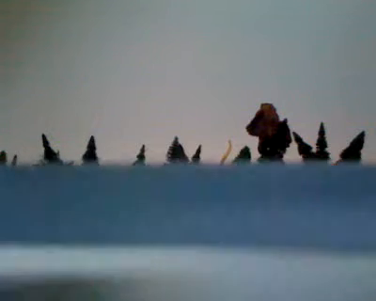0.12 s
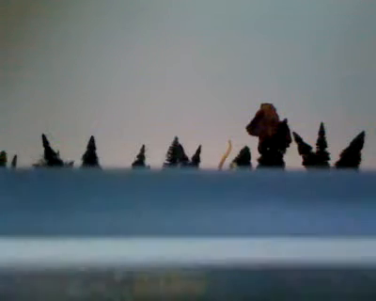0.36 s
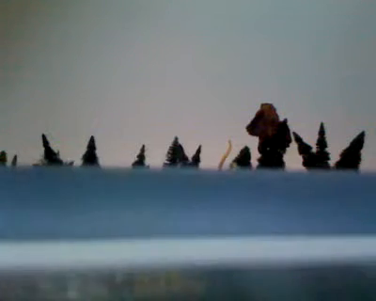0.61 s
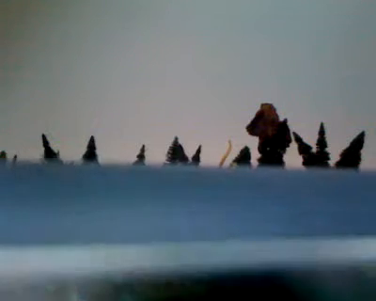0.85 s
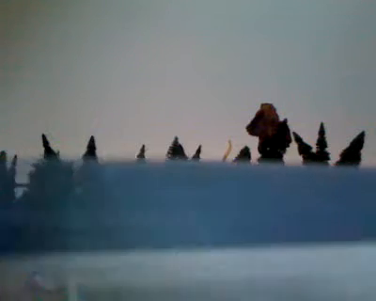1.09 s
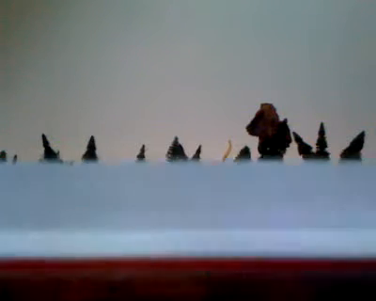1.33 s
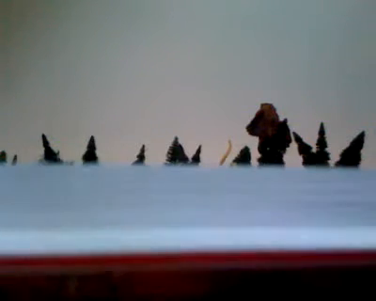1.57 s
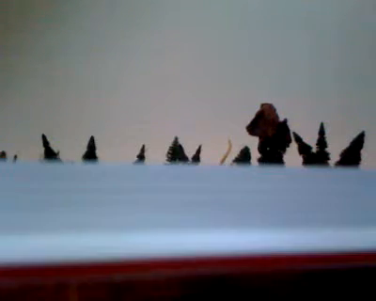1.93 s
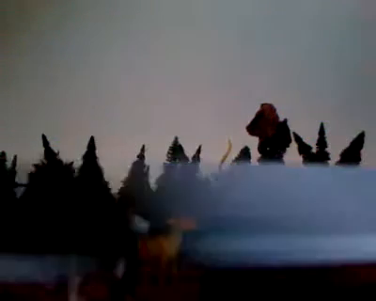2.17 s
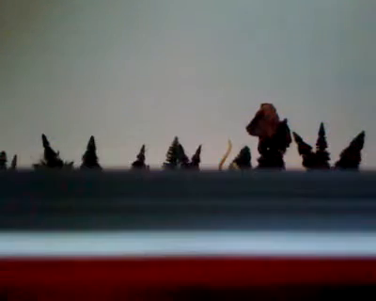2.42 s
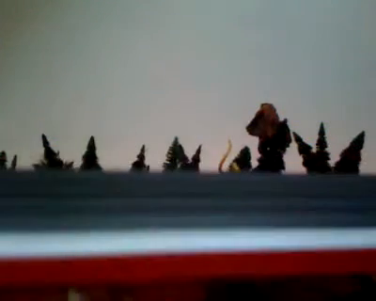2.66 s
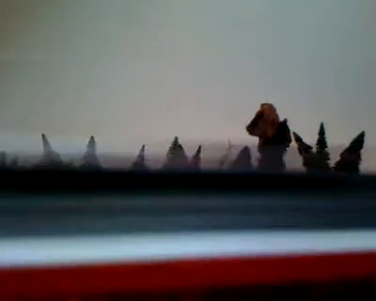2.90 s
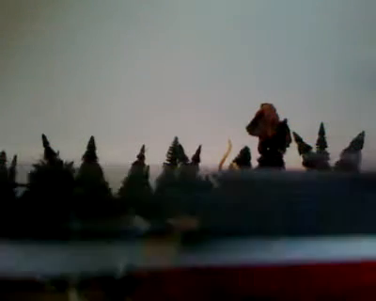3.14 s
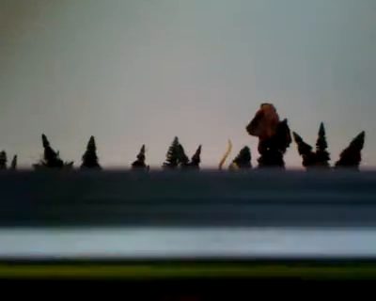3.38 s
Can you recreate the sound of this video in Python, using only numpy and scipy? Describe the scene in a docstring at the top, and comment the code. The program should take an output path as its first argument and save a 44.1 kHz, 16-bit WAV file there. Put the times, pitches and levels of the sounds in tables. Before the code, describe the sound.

A model train rolls past close by for about three and a half seconds, its wheels hissing and crackling steadily. About once a second a coach brings a whirr that sinks in pitch, with slight metallic ringing. Wheels clack in pairs over a rail joint near 1.4, 2.4 and 3.5 seconds. Couplings rattle lightly throughout, while the wooden board rumbles and thumps softly and the motor hums faintly.

```python
"""Beside a model railway fixed to a wooden board, one microphone close to the track.
A train rolls past at about one coach a second, its wheels hissing on the rails and crackling over grit.
Each coach brings a whirr that sinks as it goes by; some wheels rub and ring, and flanges tick.
Pairs of wheelsets clack over a rail joint, and loose couplings and axles rattle.
Underneath, the board rumbles and thumps and the motor hums faintly."""
import sys
import numpy as np
from scipy import signal
from scipy.fft import rfft, irfft
from scipy.io import wavfile
from scipy.ndimage import uniform_filter1d

SR = 44100
rng = np.random.default_rng(int(sys.argv[2]) if len(sys.argv) > 2 else 0)


def wav_out(sig):
    """Save sig, one row per channel (or a flat mono array), as 16-bit PCM at SR to the path in sys.argv[1]."""
    wavfile.write(sys.argv[1], SR, np.round(np.clip(np.atleast_2d(sig).T, -1, 1) * 32767).astype(np.int16))


N = 158760


def rolling():
    """Wheels roll on the rails: a broad hiss, slightly patchy in time and pitch."""
    # Each row: frequency in Hz, relative level in dB.
    spectrum = [(100, -23), (200, -18.5), (300, -8), (480, -10), (620, -5), (820, -1.2), (1100, -1.5),
                (1500, -2), (2400, 0), (3300, -5), (4000, -8), (5000, -13), (7200, -18), (10000, -26),
                (13000, -31), (16000, -38)]
    # Each row: time in seconds, level change in dB.
    swell = [(0, 0), (.25, -.5), (1, 1), (1.25, 0), (1.8, -.5), (2.4, 1), (2.65, 0), (2.85, 0), (3.3, 0.5),
             (3.6, .5)]
    cells = signal.stft(rng.standard_normal(N), nperseg=512)[2]
    patches = uniform_filter1d(rng.standard_normal(cells.shape), size=6, axis=0)
    patch_db = 0.86 * unit(uniform_filter1d(patches, size=9, axis=1))
    hiss = signal.istft(cells * amp(patch_db), nperseg=512)[1][:N]
    flicker_db = 0.5 * drift(rate_hz=51)
    return amp(-40 + level_curve(swell) + flicker_db) * colour(hiss, spectrum)


def coach_whirrs():
    """Each coach brings a rasping band of wheel noise that swells, then sinks in pitch as it leaves."""
    # Each row: start and length in seconds, level in dB, first and last pitch in Hz.
    coaches = [(0.27, 0.93, -47.5, 3150, 2080), (1.332, 1, -46, 3180, 1500), (2.521, 0.79, -46, 3280, 2050),
               (3.37, 1.0, -45, 3300, 1500)]
    out = np.zeros(N)
    for start, length, db, first_hz, last_hz in coaches:
        noise = rng.standard_normal(round(length * SR))
        progress = np.linspace(0, 1, len(noise))
        hz = first_hz + (last_hz - first_hz) * progress ** 2.7
        swell = abs(np.sin(np.pi * progress)) ** 0.18
        add(out, start, amp(db) * swell * resonate(noise, hz, width_hz=1300))
    return out


def joint_clacks():
    """Wheelsets drop into the rail joint: the steel cracks and rings, and the track bed knocks."""
    # Each row: start in seconds, gain in dB, knock gain on top of that in dB, knock pitch in Hz,
    # place in the bogie.
    crossings = [(1.4208, -24, -2, 1710, "leading"), (1.5109, -24.5, -0.5, 1316, "trailing"),
                 (2.4452, -24.5, 0, 1470, "leading"), (2.5330, -27.5, 5.5, 1190, "trailing"),
                 (3.4553, -25.5, 1, 1210, "leading"), (3.5479, -26.5, -10, 1310, "trailing")]
    # Steel striking the rail end. Each row: frequency in Hz, relative level in dB.
    crack_spectrum = [(300, -30), (1000, -14), (3000, -3), (6000, 4), (9000, -5), (15000, -15)]
    # Leading and trailing wheelset. Each row: pitch in Hz, relative level in dB, seconds to fall 60 dB.
    wheel_modes = {"leading": [(2250, -5, 0.011), (3120, 0.5, 0.008), (5300, 0.5, 0.011), (5830, -3, 0.011),
                   (8100, -8, 0.011), (8900, -6, 0.014)], "trailing": [(2730, 0, 0.014), (4300, -3, 0.011),
                   (5470, -5, 0.0094), (7310, 3.5, 0.0079), (8500, -5, 0.011)]}
    metal_rise_s, knock_rise_s, crack_decay_s = 0.00054, 0.00099, 0.0032
    out, t = np.zeros(N), np.arange(2048) / SR
    for start, db, knock_db, hz, wheelset in crossings:
        crack = colour(rng.standard_normal(len(t)), crack_spectrum) * np.exp(-t / crack_decay_s)
        metal = rise(t, metal_rise_s) * (ring(wheel_modes[wheelset], t) + amp(-3.5) * crack)
        bed_modes = [(0.85 * hz, 0, 0.014), (hz, -2, 0.028), (1.32 * hz, -3, 0.021)]
        knock = amp(knock_db) * rise(t, knock_rise_s) * ring(bed_modes, t)
        add(out, start, amp(db) * (metal + knock))
    return out


def rattles():
    """Loose couplings and axles chatter for a few milliseconds, dull or bright."""
    # Each row: start in seconds, relative level of the low, middle and high band in dB.
    chatters = [(0.179, -31, -32, -35), (0.189, -34.5, -38, -32.5), (0.2045, -34, -27.5, -43),
                (.279, -42, -41, -40), (.302, -30.5, -29, -34), (0.37, -42, -34, -36.5),
                (0.482, -29, -28.5, -32.5), (.5432, -41, -36, -37), (0.6514, -45, -26.5, -42),
                (.719, -30, -32, -34.5), (0.8125, -31, -26, -27.5), (0.9197, -39, -28, -34),
                (0.9984, -31, -29, -34.5), (1.063, -28, -27, -37), (1.1528, -35, -31, -37),
                (1.2231, -30, -28.5, -34), (1.3274, -27, -40, -37), (1.352, -37, -26.5, -39),
                (1.4596, -43, -26.5, -35.5), (1.696, -39, -26, -33), (1.756, -40, -34, -34),
                (1.793, -49, -23, -34), (1.850, -50, -25.5, -32), (2.0366, -33, -30, -34.5),
                (2.195, -34, -33, -43), (2.267, -44, -51, -39), (2.372, -29.5, -31, -42),
                (2.392, -42, -25, -32.5), (2.466, -30, -24, -34), (2.487, -38, -28, -33),
                (2.825, -34, -29.5, -37.5), (2.8568, -33, -33, -35.5), (3.0775, -29, -28, -31),
                (3.1748, -29.5, -31, -41), (3.419, -29, -32, -34), (3.459, -36, -22.5, -43),
                (3.51, -30, -25.5, -34.5), (3.5377, -38, -28, -37)]
    # Each row: lower and upper band edge in Hz.
    bands = [(800, 1900), (1900, 3900), (3900, 15800)]
    rise_s, decay_s, rolloff_hz = 0.0011, 0.0026, 7040
    out, t = np.zeros(N), np.arange(2048) / SR
    hz = np.fft.rfftfreq(len(t), 1 / SR)
    envelope = amp(db=1) * rise(t, rise_s) * np.exp(-t / decay_s)
    for start, *levels_db in chatters:
        spectrum = rfft(rng.standard_normal(len(t))) / (1 + (hz / rolloff_hz) ** 3)
        parts = [unit(irfft(spectrum * (hz >= low) * (hz < high))) for low, high in bands]
        burst = sum(amp(db) * part for db, part in zip(levels_db, parts))
        add(out, start, envelope * burst)
    return out


def grit():
    """Wheels run over grit: tiny bursts at random moments, a few of them larger."""
    # Each row: frequency in Hz, relative level in dB.
    spectrum = [(200, -37), (800, -1), (1500, 3.5), (3000, 4), (4500, -3), (7500, -9), (11000, -17),
                (16000, -29)]
    # Each row: time in seconds, level change in dB.
    swell = [(0, -5), (.35, 1.5), (.85, -1.5), (1.3, -2.5), (1.75, -0.5), (2.1, -2), (2.68, 0.5), (2.78, 5),
             (2.92, -3), (3.3, -1.5), (3.6, 2.5)]
    grains_per_s, spread_db, decay_s = 450, 5, 0.0035
    sizes = amp(spread_db * np.minimum(rng.exponential(1, N), 3.5))
    grains = sizes * (rng.random(N) < grains_per_s / SR)
    power = signal.lfilter([1], [1, -np.exp(-2 / (decay_s * SR))], grains ** 2)
    crackle = colour(np.sqrt(power) * rng.standard_normal(N), spectrum)
    return amp(-45 + level_curve(swell)) * crackle


def singing_wheels():
    """Wheels rub the rail: narrow, wavering rings swell out of the whirr and fade."""
    # Each row: start and length in seconds, level in dB, first pitch, last pitch and width in Hz.
    rubs = [(0.269, .26, -51, 3280, 3400, 260), (.55, .41, -47, 2800, 2610, 400),
            (.58, .25, -47, 3050, 3240, 260), (1.379, 0.34, -49, 3260, 3400, 260),
            (1.74, 0.27, -47.5, 2970, 2840, 180), (1.97, .17, -45.5, 2200, 2110, 220),
            (2.34, 0.17, -47.7, 1620, 1430, 160), (2.49, .18, -50.5, 3400, 3380, 200),
            (2.73, 0.38, -46.5, 3130, 3100, 460), (3.11, 0.19, -50, 2140, 1890, 300)]
    out = np.zeros(N)
    for start, length, db, first_hz, last_hz, width_hz in rubs:
        noise = rng.standard_normal(round(length * SR))
        progress = np.linspace(0, 1, len(noise))
        wobble = 1 + 0.016 * drift(rate_hz=14)[:len(noise)]
        rasp_db = 2 * drift(rate_hz=26)[:len(noise)]
        hz = (first_hz + (last_hz - first_hz) * progress) * wobble
        swell = abs(np.sin(np.pi * progress)) ** 0.32
        add(out, start, amp(db + rasp_db) * swell * resonate(noise, hz, width_hz))
    return out


def flange_ticks():
    """Flanges touch the rail: thin, bright, very short bursts."""
    # Each row: start in seconds, level in dB.
    touches = [(.046, -45), (.1905, -37), (.389, -46), (.9203, -38), (.969, -44), (1.075, -44),
               (1.564, -43), (1.7565, -41), (1.996, -46), (2.165, -41), (2.179, -43)]
    # Each row: frequency in Hz, relative level in dB.
    spectrum = [(500, -30), (3000, 4), (6000, -5), (9000, -4), (12500, -3), (16000, -12)]
    decay_s = 0.0018
    out, t = np.zeros(N), np.arange(1024) / SR
    for start, db in touches:
        burst = colour(rng.standard_normal(len(t)), spectrum)
        add(out, start, amp(db) * burst * np.exp(-t / decay_s))
    return out


def board():
    """The wooden board rumbles under the train and now and then thumps softly."""
    # Each row: frequency in Hz, relative level in dB.
    rumble = [(10, -14), (30, -15), (45, -0.5), (56, -3), (70, 2.5), (90, -1), (112, -6.5), (135, 0),
              (155, -6), (175, -11.5), (260, -20.5), (600, -47)]
    # Each row: start in seconds, gain in dB.
    thumps = [(0.18, -47), (0.476, -38), (.80, -45), (0.927, -42), (1.328, -46), (1.553, -42),
              (2.839, -37.5), (3.44, -48)]
    t = np.arange(SR // 2) / SR
    thump = rise(t, rise_s=0.013) * ring([(71.3, 1, 0.16), (105.4, 0.92, 0.19), (148, 1, 0.11)], t)
    out = amp(-53.5) * colour(rng.standard_normal(N), rumble)
    for start, db in thumps:
        add(out, start, amp(db) * thump)
    return out


def motor():
    """The motor hums faintly at its shaft speed and two overtones, wavering with the load."""
    shaft_hz, harmonics_db = 137, [-64.5, -74, -69]
    speed_hz = shaft_hz * (1 + 0.01765 * drift(rate_hz=5.95))
    phase = 2 * np.pi * np.cumsum(speed_hz) / SR
    return sum(amp(db) * unit(np.sin(k * phase)) for k, db in enumerate(harmonics_db, start=1))


def amp(db):
    return 10 ** (np.asarray(db) / 20)


def unit(x):
    return x / np.sqrt(np.mean(x ** 2) + 1e-20)


def rise(t, rise_s):
    return 1 - np.exp(-t / rise_s)


def level_curve(points):
    return np.interp(np.arange(N) / SR, *np.transpose(points))


def add(mix, start_s, sound):
    part = mix[round(start_s * SR):][:len(sound)]
    part += sound[:len(part)]


def colour(x, spectrum):
    """Shapes x by a spectrum drawn on a log-frequency axis; the result has an rms of 1."""
    points_hz, points_db = np.transpose(spectrum)
    hz = np.fft.rfftfreq(len(x), 1 / SR)
    gain_db = np.interp(np.log(hz + 1), np.log(points_hz + 1), points_db)
    return unit(irfft(rfft(x) * amp(gain_db), len(x)))


def drift(rate_hz):
    """A random wander with an rms of 1."""
    hz = np.fft.rfftfreq(N, 1 / SR)
    lowpass = (hz > 0) * np.exp(-(hz / rate_hz) ** 2)
    return unit(irfft(rfft(rng.standard_normal(N)) * lowpass, N))


def resonate(x, hz, width_hz):
    """A steep resonance that follows the curve hz."""
    carrier = np.exp(2j * np.pi * np.cumsum(hz) / SR)
    pole = np.exp(-np.pi * width_hz / SR)
    baseband = signal.lfilter([1], [1, -2 * pole, pole ** 2], x / carrier)
    return unit((carrier * baseband).real)


def ring(modes, t):
    """Struck modes dying away. Each mode: pitch in Hz, level in dB, seconds to fall 60 dB."""
    return sum(amp(db - 60 * t / t60) * np.sin(2 * np.pi * hz * t) for hz, db, t60 in modes)


def scene():
    """The whole train at the trackside microphone, in mono."""
    steady = rolling() + grit() + board() + motor()
    passing = coach_whirrs() + singing_wheels() + flange_ticks() + joint_clacks() + rattles()
    return (steady + passing)[None]


def record(dry):
    """The recorder cuts off the highest treble."""
    cutoff_hz = 15950
    lowpass = signal.firwin(511, cutoff_hz, window=("kaiser", 9), fs=SR)
    return signal.oaconvolve(dry, lowpass[None], "same")


dry = scene()
out = record(dry)
wav_out(out)
```